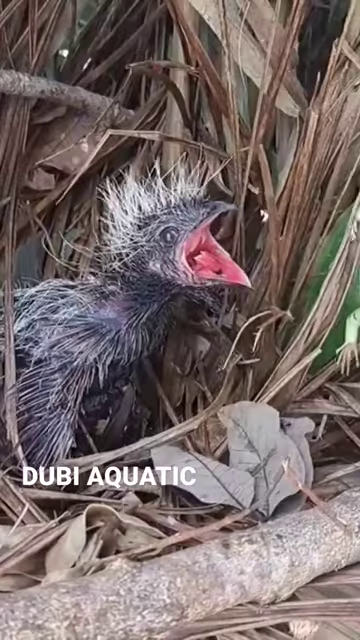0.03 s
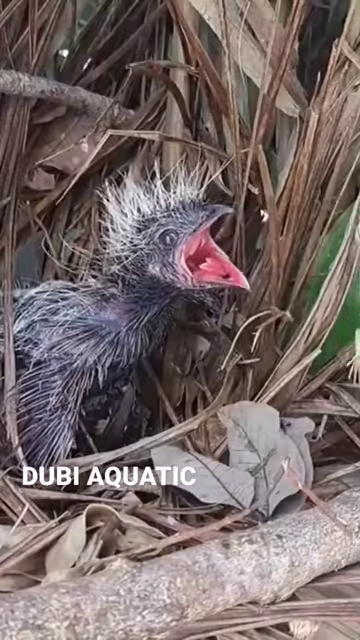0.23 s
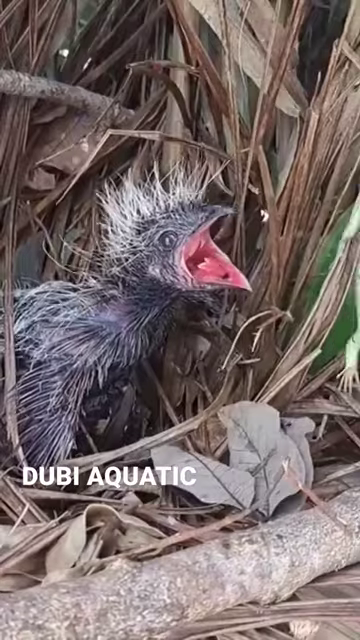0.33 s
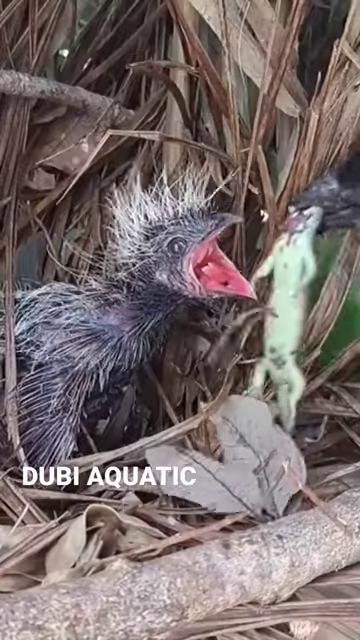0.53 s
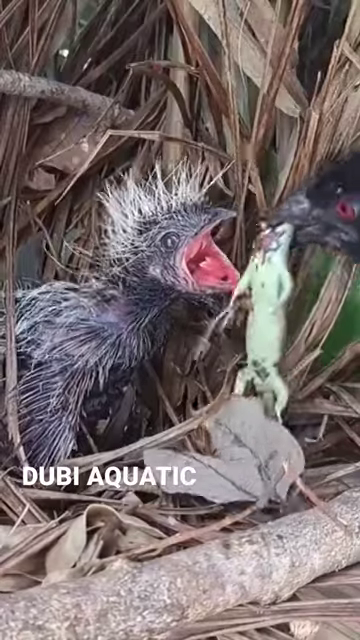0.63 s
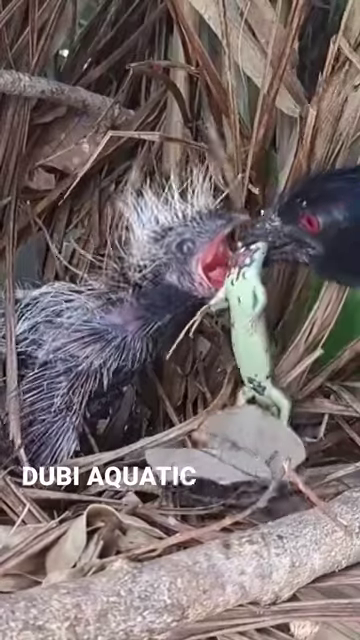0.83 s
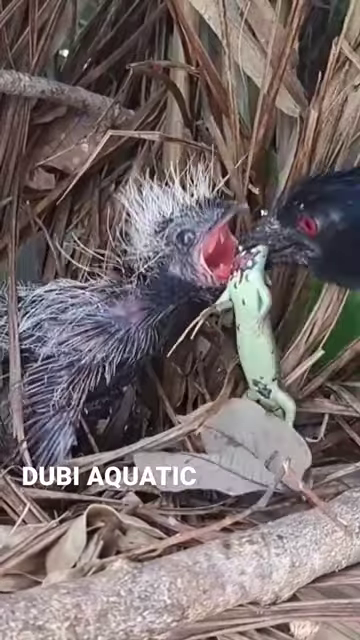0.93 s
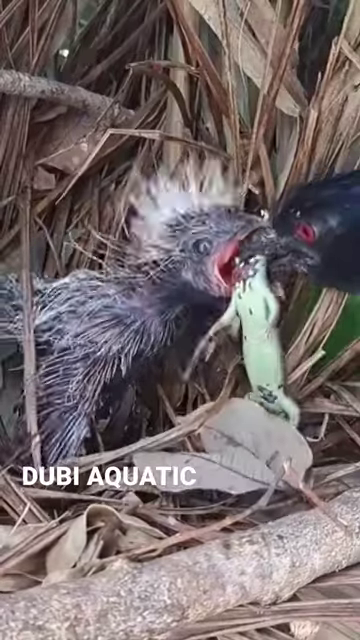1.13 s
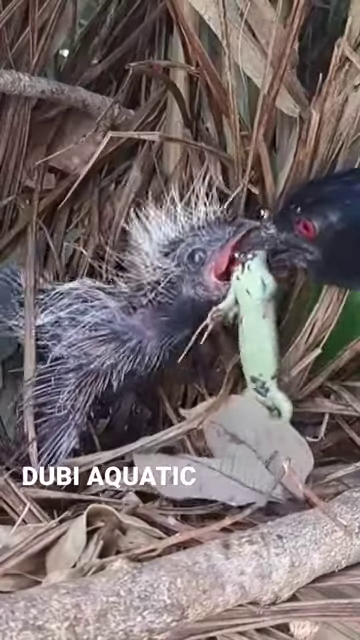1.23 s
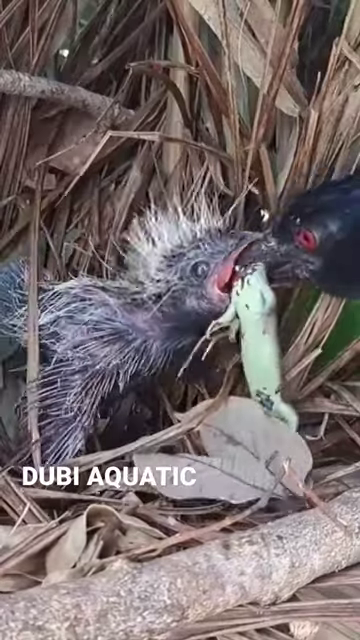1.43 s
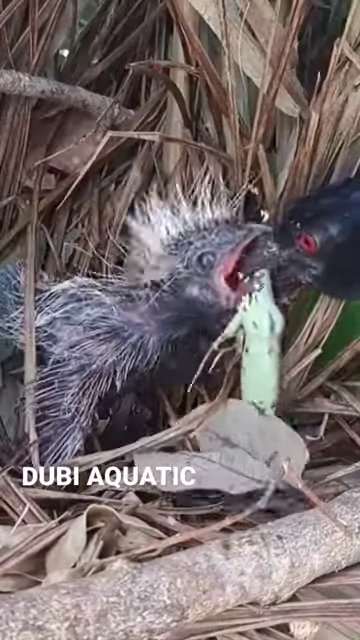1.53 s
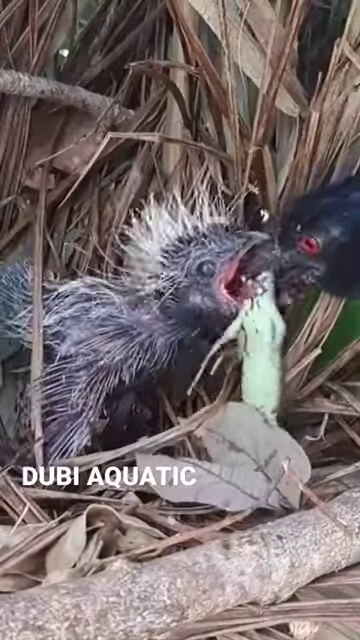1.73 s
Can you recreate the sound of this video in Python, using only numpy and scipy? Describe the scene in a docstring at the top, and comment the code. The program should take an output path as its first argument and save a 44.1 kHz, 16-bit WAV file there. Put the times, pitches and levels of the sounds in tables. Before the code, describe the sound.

A chick begs with a long rasping hiss from about 0.2 to 0.9 seconds, close and slightly left. A second call rattles at 1.05, squeals briefly and sputters. A hollower rasp follows from 1.3 to 1.6 as it is fed, and another begins at 1.75. A distant engine putters faintly in the open air, and a few soft, dull bumps touch the microphone on the right.

```python
"""A nestling begs with long rasping hisses in dry reeds, close and a little to the left.
Fluttering air makes its throat, mouth and beak ring. The second call rattles, breaks into a
short squeal, then sputters; the last two turn hollow as the chick is fed.
Far off an engine putters in the open air, and a few soft bumps reach the microphone."""
import sys
import numpy as np
from scipy import signal
from scipy.fft import rfft, irfft
from scipy.io import wavfile
from scipy.ndimage import map_coordinates

SR = 44100
rng = np.random.default_rng(int(sys.argv[2]) if len(sys.argv) > 2 else 0)


def transcribe(u):
    """Save the signal u as a 16-bit wav file named by the first command-line argument.

    u: samples, shape (n,) or (channels, n), limited to [-1, 1]; the rate is SR.
    q: integer samples, one column per channel.
    """
    v = np.clip(np.atleast_2d(u).T, -1, 1)
    q = np.round(v * 32767).astype(np.int16)
    wavfile.write(sys.argv[1], SR, q)


N = 79380
T, HZ = np.arange(N) / SR, np.fft.rfftfreq(N, 1 / SR)

# how hard the chick pushes in its second call: time_s, level_db
SECOND_CALL = [(1.039, -53), (1.046, -56), (1.052, -33), (1.164, -36.5), (1.168, -41), (1.269, -49.5)]


def amp(db):
    """Turns decibels into a gain."""
    return 10 ** (np.asarray(db) / 20)


def unit(x):
    """Scales a sound so that the average of its channels has strength (rms) 1."""
    return x / np.sqrt(np.mean(np.atleast_2d(x).mean(0) ** 2) + 1e-20)


def pan(db):
    """Left and right gains; positive decibels lean left."""
    left = amp(np.atleast_1d(db))
    return 2 * np.array([left, np.ones_like(left)]) / (1 + left)


def over_hz(table):
    """Joins a table's rows into curves over frequency."""
    hz, *columns = np.transpose(table)
    return np.array([np.interp(np.log(HZ + 1), np.log(hz), c) for c in columns])


def over_time(table):
    """Joins a table's rows into curves over time."""
    times, *columns = np.transpose(table)
    return np.array([np.interp(T, times, c) for c in columns])


def during(table):
    """On from a table's first time to its last, with short soft edges."""
    start, end = table[0][0], table[-1][0]
    return np.clip((T - start) / .004 + .5, 0, 1) * np.clip((end - T) / .004 + .5, 0, 1)


def wobble(hz):
    """Random motion up to about the given rate."""
    return unit(irfft(rfft(rng.standard_normal(N)) / (1 + (HZ / hz) ** 4), N))


def ring(x, resonances):
    """Passes a sound through fixed resonances; their levels set only the balance."""
    power = sum(amp([[left], [right]]) ** 2 / (1 + (2 * (HZ - hz) / width) ** 2) ** 2
                for hz, width, left, right in resonances)
    return unit(irfft(rfft(x) * np.sqrt(power), N))


def moving_ring(x, hz, width_hz):
    """Passes a sound twice through a resonance whose pitch moves."""
    turn = np.exp(2j * np.pi * np.cumsum(hz) / SR)
    decay = np.exp(-np.pi * width_hz / SR)
    for _ in range(2):
        x = 2 * (turn * signal.lfilter([1 - decay], [1, -decay], x / turn)).real
    return x


def outdoors():
    """Faint rumble and wash of open air."""
    # tone of the air: frequency_hz, left_db, right_db
    air_tone = [(20, -23.5, -4), (56, 2, 13), (122, 9, -2.5), (260, 5, -12.5), (580, -14.5, -13.5),
                (1110, -4.5, -24), (2520, -16, -25), (15000, -31, -33.5)]
    noise = rng.standard_normal((2, N))
    return amp(-54.5) * unit(irfft(rfft(noise) * amp(over_hz(air_tone)), N))


def engine():
    """Distant puffs, strong and weak in turn, make an exhaust pipe ring."""
    # pipe resonances: pitch_hz, width_hz, left_db, right_db
    exhaust = [(135, 93, 0.009, 0), (256.4, 66, 0.0025, 0.0039)]
    puffs_per_s, fade_s, weak_db = 40, .004, -3
    count = puffs_per_s * T
    puffs = np.exp(-(count % 1) / puffs_per_s / fade_s) * amp(weak_db * (np.floor(count) % 2))
    gas = rng.standard_normal(N) + rng.standard_normal((2, N))
    return amp(-55) * ring(puffs * gas, exhaust) * pan(2)


def bumps():
    """Dull pushes on the microphone, on the right, that die within two swings."""
    # each push: start_s, level_db, pitch_hz
    pushes = [(0.407, -43.5, 63.8), (0.508, -42, 60.3), (0.761, -33.5, 55.4), (1.016, -38.5, 63.6),
              (1.624, -44, 60)]
    rise_s = .0062
    out = np.zeros(N)
    for start, db, hz in pushes:
        age = np.maximum(T - start, 0)
        out += amp(db) * age / rise_s * np.exp(1 - age / rise_s) * np.sin(2 * np.pi * hz * age)
    return out * pan(-32.5)


def nest_echoes(x):
    """Adds close echoes off the ground and reeds."""
    # each echo: left_delay_s, right_delay_s, gain
    echoes = [(.00085, .00112, .16), (.0020, .0017, .16), (.0046, .0037, 0.28)]
    out = x.copy()
    for left_s, right_s, gain in echoes:
        for ear, delay in enumerate((left_s, right_s)):
            out[ear] += gain * map_coordinates(x[ear], [(T - delay) * SR], order=3)
    return out


def effort():
    """How hard the chick pushes: four calls and a few spits of air."""
    # the push behind the other three calls: time_s, level_db
    first_call = [(.22, -96), (.231, -30.5), (.262, -35.5), (.278, -31), (.37, -31.5), (.51, -25.5),
                  (.533, -21.5), (.588, -29.5), (.615, -25), (.718, -32), (.782, -23.5), (.812, -24),
                  (.85, -29), (.885, -30), (.921, -38), (.945, -68.5)]
    third_call = [(1.269, -51), (1.314, -42), (1.337, -34.5), (1.342, -28.5), (1.395, -33), (1.45, -42.5),
                  (1.502, -32), (1.536, -43.5), (1.599, -59)]
    last_call = [(1.749, -70), (1.754, -41), (1.8, -37)]
    # spits that open and trail the second call: middle_s, length_s, level_db
    spits = [(1.0548, .013, -32), (1.186, .014, -38.5), (1.199, .016, -38), (1.222, .009, -38),
             (1.251, .042, -37.5)]
    calls = sum(amp(over_time(c)[0]) * during(c) for c in (first_call, SECOND_CALL, third_call))
    calls += amp(over_time(last_call)[0]) * (T > last_call[0][0])
    sputter = sum(amp(db) * np.maximum(1 - (2 * (T - middle) / length) ** 2, 0)
                  for middle, length, db in spits)
    return calls + sputter


def shaky_phase(hz, wander, wander_hz):
    """The running angle of a vibration whose pitch wanders by a share of itself."""
    return 2 * np.pi * np.cumsum(hz * (1 + wander * wobble(wander_hz))) / SR


def rattle():
    """In the second call the throat opens and narrows in uneven beats."""
    beat = np.cos(shaky_phase(240, wander=.2, wander_hz=240))
    return 1 + .3 * beat * during(SECOND_CALL[1:])


def squeal():
    """A thin voiced tone falls through the second call and ends as a clear squeal."""
    # the falling tone: time_s, pitch_hz, level_db
    glide = [(1.06, 1080, -49), (1.1, 893, -45), (1.125, 865, -42), (1.138, 845, -34), (1.147, 805, -35),
             (1.153, 785, -50)]
    # its overtones: pitch_multiple, level_db
    overtones = [(3, -13), (6, 0), (7, -4), (10, -9), (12, -7)]
    hz, db = over_time(glide)
    phase = shaky_phase(hz, wander=.005, wander_hz=485)
    tone = sum(amp(level) * np.sin(round(k) * phase) for k, level in overtones)
    return unit(tone) * amp(db) * rattle() * during(glide) * pan(10)


def voice():
    """The half-formed voice in the hiss: overtones whose pitch never settles."""
    phase = shaky_phase(850, wander=.06, wander_hz=55)
    return unit(sum(np.cos(k * phase + 2 * np.pi * rng.random()) for k in range(1, 23)))


def rasp():
    """Rushing air and a trace of voice, fluttering slightly, at the two ears."""
    # how alike the ears hear it: frequency_hz, likeness (0-1), left_lead_radians
    ears = [(1400, .15, 0), (3000, .76, 0), (4800, .68, .6), (5700, .72, 1.3), (7000, .5, -1.5),
            (7800, .82, -.3), (8500, .88, 0), (9500, .72, 1.2), (10500, .72, .8), (12500, .42, .4)]
    voice_share, flutter_db, flutter_hz = .3, .83, 86.5
    breath, other_noise = rng.standard_normal((2, N))
    likeness, lead = over_hz(ears)
    left = rfft(np.sqrt(1 - voice_share) * breath + np.sqrt(voice_share) * voice())
    right = (likeness * left + np.sqrt(1 - likeness ** 2) * rfft(other_noise)) * np.exp(-1j * lead)
    return irfft(np.array([left, right]), N) * amp(flutter_db * wobble(flutter_hz))


def whistles(air):
    """Two narrow whistles rise with the first swell of the long call."""
    # their resonances: pitch_hz, width_hz, left_db, right_db
    tones = [(3110, 110, 0, 0), (3450, 100, -2, -3)]
    # their strength against the call: time_s, level_db
    swell = [(.38, -25), (.53, -15), (.68, -27)]
    return ring(air, tones) * amp(over_time(swell)[0]) * during(swell)


def throat(air):
    """A broad resonance with a narrow ring at its centre, strongest while the beak is blocked."""
    # the moving resonance: time_s, pitch_hz, left_over_right_db
    path = [(.226, 4230, 17), (.242, 3630, 7), (.32, 2590, 2), (1.1, 3080, 5.5), (1.34, 3340, 6.5),
            (1.37, 2900, 8.5)]
    # the narrow ring against the broad one: time_s, level_db
    narrow_level = [(1.25, -10), (1.34, 0)]
    bass_cut_hz = 1930
    hz, lean_db = over_time(path)
    broad = moving_ring(air, hz, width_hz=2260)
    broad = unit(irfft(rfft(broad) / np.sqrt(1 + (bass_cut_hz / (HZ + 1)) ** 12), N))
    narrow = unit(moving_ring(air, hz, width_hz=520))
    share = amp(over_time(narrow_level)[0])
    return unit((broad + share * narrow) / (1 + share)) * pan(lean_db)


def mouth_and_beak(air):
    """Mouth and beak resonances drift up and down together as the opening changes."""
    # resonances of each: pitch_hz, width_hz, left_db, right_db
    mouth_tones = [(4340, 770, -12.5, -14.5), (4850, 290, -1, -11.5), (5118, 260, -1.5, -12),
                   (5520, 240, -4.5, -8.5), (5964, 320, -2.5, -28.5), (6420, 650, -8.5, -17),
                   (7260, 440, -14, -15)]
    beak_tones = [(8017, 630, -1.5, -6.5), (8630, 320, -6, -5.5), (9460, 990, -3, -13),
                  (9700, 140, 0.5, -12.5), (10137, 910, -0.5, -13.5)]
    position = np.cumsum(1 + .011 * wobble(hz=12))  # reading faster raises the pitch
    return [np.array([map_coordinates(ear, [position], order=5, mode="grid-wrap") for ear in part])
            for part in (ring(air, mouth_tones), ring(air, beak_tones))]


def hiss():
    """The chick's breath rings in throat, mouth and beak; effort sets how loud it is."""
    # high sizzle and low undertone: pitch_hz, width_hz, left_db, right_db
    sizzle_tones = [(11870, 2000, -13, -14.5), (13770, 2600, -16, -16.5)]
    low_tones = [(1050, 1300, -2, -10), (2130, 340, 10, -16)]
    # each part against the mouth: time_s, throat_db, beak_db, sizzle_db
    balance = [(.234, -12, 2, -6.5), (.26, -23.5, -1.5, -8.5), (.35, -11, 2.5, -8), (.53, -14, 2.5, -5),
               (.85, -7, 5, -7), (1.08, -17, -5, -9), (1.255, -6, -1, -16), (1.3, 4.5, 0, -4),
               (1.35, 10, 13, -1.5), (1.4, 10, 14, 1), (1.45, 6, -3.5, -9), (1.505, 4.5, -1.5, -6),
               (1.58, 9.5, 6.5, -1)]
    air = rasp()
    mouth, beak = mouth_and_beak(air)
    throat_gain, beak_gain, sizzle_gain = amp(over_time(balance))
    total = np.sqrt(1 + throat_gain ** 2 + beak_gain ** 2 + sizzle_gain ** 2)
    blend = mouth + throat_gain * throat(air) + beak_gain * beak + sizzle_gain * ring(air, sizzle_tones)
    undertone = amp(-20.5) * np.sqrt(throat_gain / total) * ring(air, low_tones)
    return effort() * rattle() * (blend / total + undertone + whistles(air))


def scene():
    """The chick over its quiet surroundings."""
    return nest_echoes(hiss() + squeal()) + engine() + bumps() + outdoors()


def record(dry):
    """Opens with silence, fades in quickly and cuts the highest treble."""
    start_s, fade_s, top_hz = .2194, .0048, 15400
    faded = dry * np.clip((T - start_s) / fade_s, 0, 1)
    treble_cut = signal.firwin(255, top_hz, window=("kaiser", 9), fs=SR)
    return signal.oaconvolve(faded, treble_cut[None], "same")


dry = scene()
out = record(dry)
transcribe(out)
```